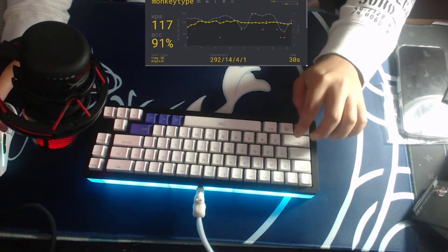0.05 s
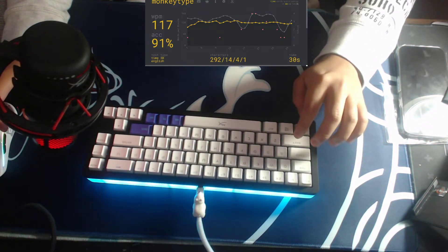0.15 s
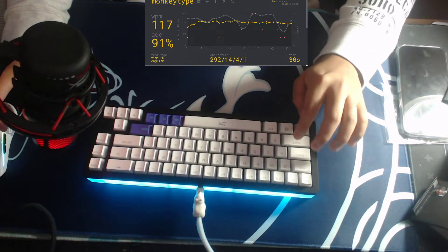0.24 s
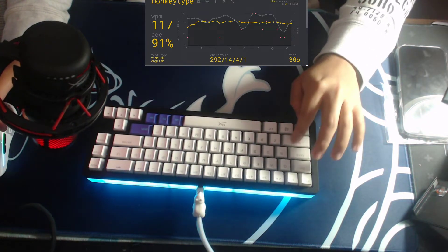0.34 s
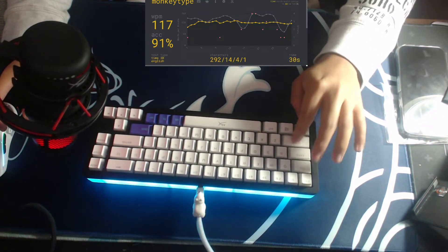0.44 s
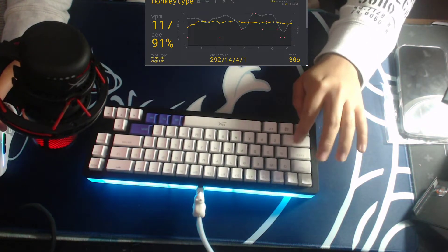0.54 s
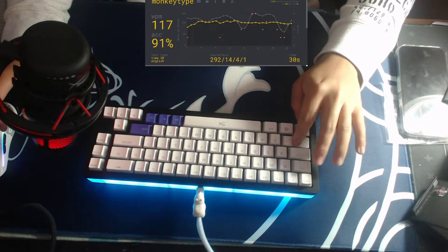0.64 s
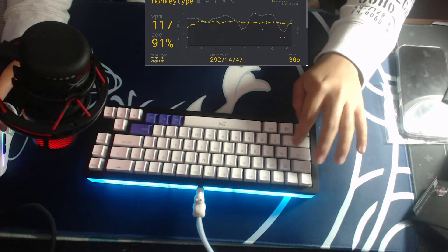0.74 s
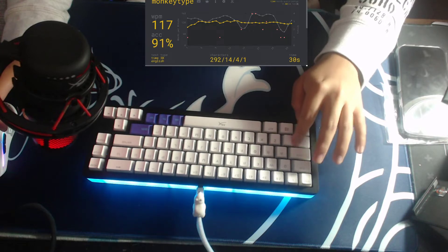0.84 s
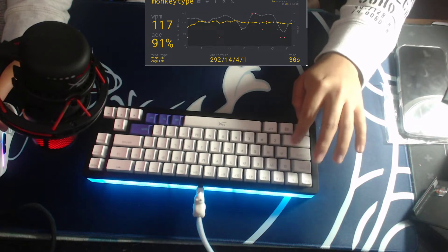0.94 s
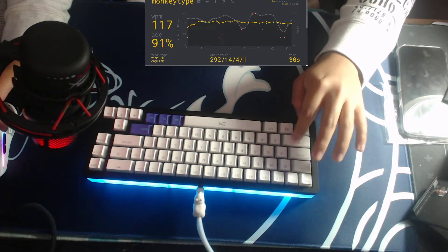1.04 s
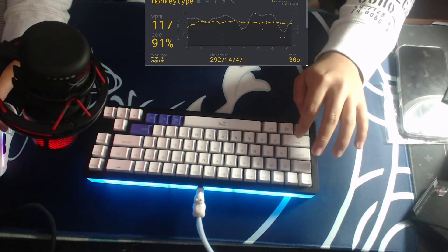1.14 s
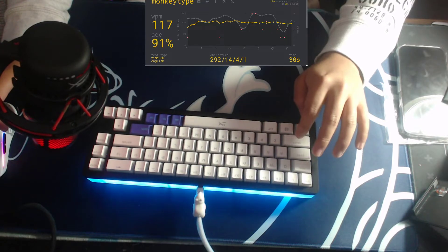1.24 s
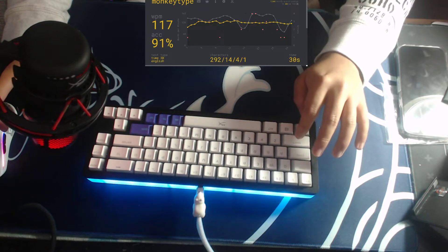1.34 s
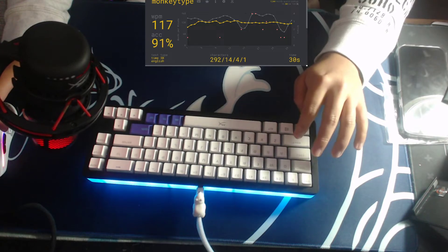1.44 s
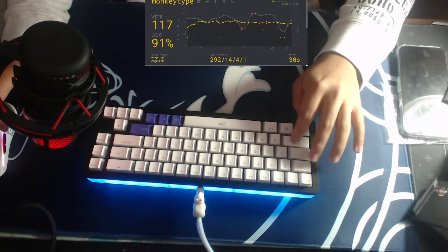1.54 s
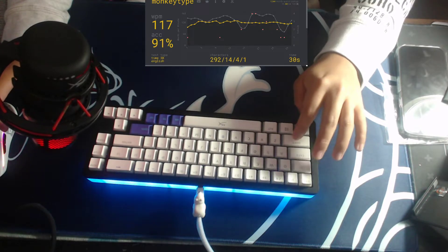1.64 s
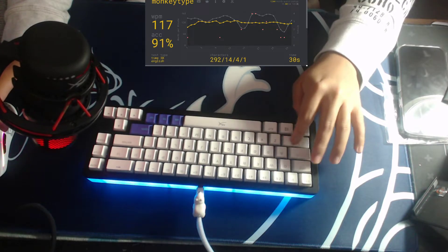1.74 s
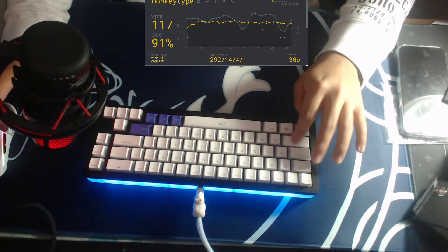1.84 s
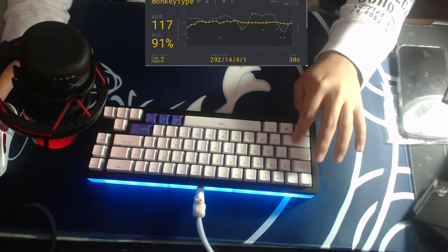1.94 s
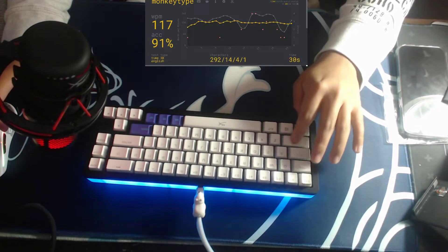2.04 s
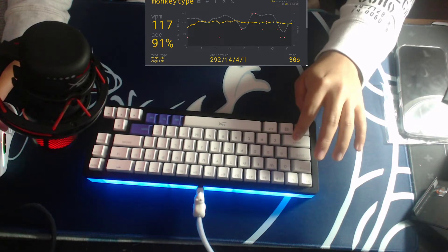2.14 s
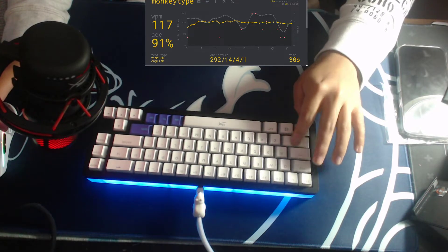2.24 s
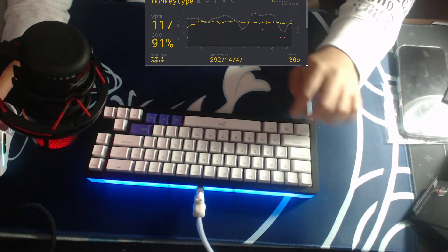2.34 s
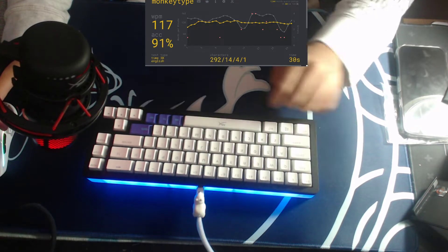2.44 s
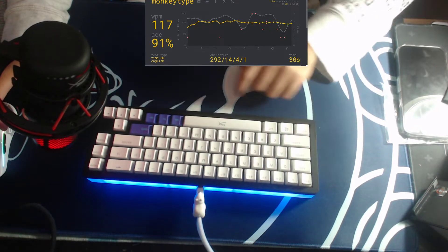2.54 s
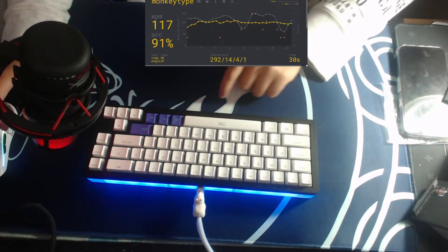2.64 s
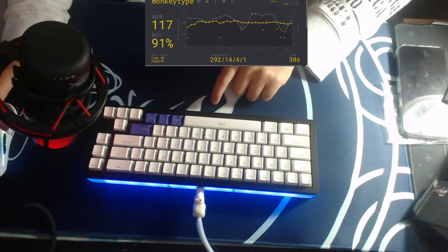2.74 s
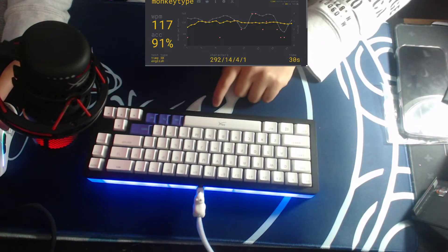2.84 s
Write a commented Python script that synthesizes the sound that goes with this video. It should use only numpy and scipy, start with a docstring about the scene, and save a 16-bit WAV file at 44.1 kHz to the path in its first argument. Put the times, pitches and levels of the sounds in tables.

```python
"""One finger taps a wide key of a mechanical keyboard in two bursts of five, near a microphone on the same desk.
Each stroke is built from ticks of the cap, noisy scrapes of the stem, and ringing knocks with a desk thump
as the key bottoms out and again, more weakly, as it springs back to its top stop.
Afterwards the hand slides over the cloth desk mat, made of shaped noise.
Behind it are a faint two-tone computer fan, a low wavering desk hum, and noise for room rumble and hiss."""
import sys
import numpy as np
from scipy import signal
from scipy.fft import rfft, irfft
from scipy.io import wavfile
from scipy.ndimage import uniform_filter1d

SR = 44100
rng = np.random.default_rng(int(sys.argv[2]) if len(sys.argv) > 2 else 0)


def log_audio(samples):
    """Write samples as a 16-bit WAV file to the path given in sys.argv[1]."""
    # one column per channel
    frames = np.atleast_2d(samples).T
    # limit to full scale, then quantise
    limited = np.clip(frames, -1, 1)
    pcm = np.round(limited * 32767).astype(np.int16)
    wavfile.write(sys.argv[1], SR, pcm)


N = 127890  # length [samples], 2.9 s


def undb(db):
    """Turn decibels into a plain multiplier."""
    return 10 ** (np.asarray(db, float) / 20)


def colour(x, table):
    """Shape a sound's spectrum with a (frequency [Hz], level [dB]) table, then set its rms to 1."""
    freqs = np.maximum(np.arange(N // 2 + 1) * SR / N, 1)
    points = np.array(table, float)
    level_db = np.interp(np.log(freqs), np.log(points[:, 0]), points[:, 1], left=-60)
    y = irfft(rfft(x) * undb(level_db), N)
    return y / np.std(y)


def walk(rate):
    """Smooth random wandering, spread near 1, from `rate` random steps per second averaged twice."""
    k = int(SR / rate)
    steps = np.repeat(rng.standard_normal(N // k + 1), k)
    return 1.06 * uniform_filter1d(uniform_filter1d(steps, k), k)[:N]


def ring(modes, push_s, extra_db=0, flip=-1):
    """Fading tones set off by a half-sine push; each start is the last one's multiplied by flip."""
    t = np.arange(SR // 4) / SR
    m = np.array(modes, float)
    gain = undb(m[:, 1] + extra_db) * flip ** np.arange(len(m))
    fade = np.exp(-np.log(1000) * t / np.maximum(m[:, 2:], 1e-3))  # 60 dB down after t60
    tones = gain @ (np.sin(2 * np.pi * m[:, :1] * t) * fade)
    push = np.sin(np.pi * np.clip(t[:SR // 40] / push_s, 0, 1))
    return np.convolve(tones, push / push.sum())[:len(t)]


def vary_modes(modes, pitch_spread):
    """No two hits excite a body alike: nudge each mode's pitch and its level (spread 1.5 dB)."""
    varied = np.array(modes, float)
    varied[:, 0] *= 1 + pitch_spread * rng.standard_normal(len(varied))
    varied[:, 1] += 1.5 * rng.standard_normal(len(varied))
    return varied


def unit_energy(x):
    """Scale a burst so its squares add up to 1."""
    return x / np.sqrt(np.sum(x ** 2))


def add(out, s, x):
    """Mix a sound in, starting at s seconds."""
    i = int(s * SR)
    out[i:i + len(x)] += x[:len(out) - i]


# spectrum of the room's rumble and hiss: (frequency [Hz], relative level [dB])
ROOM_SPECTRUM = [(8, -10), (16, 6), (28, -7.5), (58, -5.5), (100, -9.5), (138, -6.5), (170, -14.5),
                 (265, -16), (340, -22.5), (700, -28.5), (1500, -39.5), (15800, -46.5)]
ROOM_DB = -53  # rms level


def room():
    """Steady noise, strongest in the deep bass, with a faint hiss on top."""
    return undb(ROOM_DB) * colour(rng.standard_normal(N), ROOM_SPECTRUM)


def side_hiss(mid):
    """Faint noise, opposite in the two channels, that follows the treble-weighted loudness."""
    spectrum = [(12, 16), (200, 12.0), (700, 1), (4000, 12), (16000, 5)]  # (frequency [Hz], relative level [dB])
    loud = np.sqrt(uniform_filter1d(np.diff(mid, prepend=0) ** 2, size=1024) + 1e-12)
    return undb(-31.5) * loud * colour(rng.standard_normal(N), spectrum)


# low desk hum over time, before its wavering: (time [s], level [dB])
HUM_LEVEL = [(0, -62), (1.0, -54), (2.2, -50.5), (2.35, -54), (2.65, -56.5), (2.8, -58), (2.9, -76)]
HUM_HZ = 48.3  # centre of the wavering pitch


def desk_hum(t):
    """A low tone, wavering in pitch and level, comes up through the desk; it is strongest near 2.2 s."""
    tone = np.sin(2 * np.pi * np.cumsum(HUM_HZ * (1 + 0.068 * walk(18))) / SR)
    level_db = np.interp(t, *np.array(HUM_LEVEL).T) + 3.6 * walk(16)
    return np.sqrt(2) * tone * undb(level_db)


# course of the fan whine: (time [s], base pitch [Hz], level change [dB])
FAN_COURSE = [(0, 441, -2.5), (1.002, 435.4, -2), (1.453, 435, 2), (1.899, 432.5, -2), (2.5, 423.2, -10.5),
              (2.9, 427, -14)]
# the fan's tones: (multiple of the base pitch, rms level before the changes [dB])
FAN_TONES = [(0.999, -63.5), (1.198, -74)]


def fan(t):
    """Two wavering tones share a pitch that mostly sinks."""
    times, pitch_hz, level_db = np.array(FAN_COURSE).T
    hz = np.interp(t, times, pitch_hz) * (1 + 0.00051 * walk(5.35))
    phase = 2 * np.pi * np.cumsum(hz) / SR
    out = np.zeros(N)
    for multiple, db in FAN_TONES:
        out += np.sqrt(2) * undb(db + 2.7 * walk(3.0)) * np.sin(multiple * phase)
    return undb(np.interp(t, times, level_db)) * out


# the hand's slide: (time [s], level [dB], treble level relative to the rest [dB])
HAND_SLIDE = [(2.26, -88.5, -49), (2.286, -84, -27), (2.314, -64, -13), (2.348, -60.5, -22),
              (2.614, -57, -11.5), (2.674, -59, -11.5), (2.714, -65, -10), (2.73, -79, 5), (2.82, -93, 6),
              (2.836, -72.5, 7), (2.88, -76, 0), (2.9, -68, -5)]
# spectrum of the rubbed cloth: (frequency [Hz], relative level [dB])
CLOTH = [(500, -13), (1500, -11), (2400, -11), (4800, -12.5), (7800, -16.5), (10500, -25), (15700, -36)]
# spectrum of the cloth's extra treble: (frequency [Hz], relative level [dB])
CLOTH_TREBLE = [(6000, -21), (9000, -3), (12000, 0.5), (15800, -2)]


def slide(t):
    """Skin brushes cloth: noise whose strength and treble follow the slide."""
    times, level_db, treble_db = np.array(HAND_SLIDE).T
    strength = undb(np.interp(t, times, level_db, left=-120) + 1.0 * walk(39.85))
    body = colour(rng.standard_normal(N), CLOTH)
    treble = undb(np.interp(t, times, treble_db)) * colour(rng.standard_normal(N), CLOTH_TREBLE)
    return strength * (body + treble)


# stem rubbing in its housing: (start [s], end of travel [s], level [dB])
STEM_SCRAPES = [(0.21, 0.228, -51), (0.279, 0.31, -60), (0.366, 0.4, -55), (0.443, 0.467, -57),
                (0.529, 0.571, -57.5), (0.61, 0.644, -60), (0.703, 0.736, -56), (0.772, 0.813, -61.5),
                (0.881, 0.927, -53), (0.944, 0.995, -61), (1.451, 1.476, -55), (1.518, 1.558, -64),
                (1.616, 1.648, -55.5), (1.691, 1.723, -59), (1.782, 1.806, -53), (1.849, 1.891, -60),
                (1.938, 1.973, -55), (2.004, 2.038, -60), (2.115, 2.138, -52.5), (2.181, 2.213, -59)]
# spectrum of the scraping: (frequency [Hz], relative level [dB])
SCRAPE_SPECTRUM = [(530, 11.5), (900, -6.5), (1350, -2), (3010, -6.5), (4630, -7), (7130, -11), (9610, -20),
                   (11900, -15), (15700, -23.5)]
SCRAPE_RISE_S, SCRAPE_T60_S = 0.0092, 0.069  # swell, and fall by 60 dB


def scrapes(t):
    """Gritty, lumpy friction that swells as the stem starts to move and dies away after the travel."""
    grains = rng.standard_normal(N) * undb(2.3 * rng.exponential(size=N))
    grit = colour(grains, SCRAPE_SPECTRUM) * undb(2.5 * walk(250))
    strength = np.zeros(N)
    for start, end, db in STEM_SCRAPES:
        rise = np.clip((t - start) / SCRAPE_RISE_S, 0, 1)
        strength += rise * undb(db - 60 * np.clip(t - end, 0, 1) / SCRAPE_T60_S)
    return grit * strength


# small sharp clicks inside the switch: (time [s], level [dB], pitch [Hz])
SWITCH_CLICKS = [(0.2156, -44, 4900), (0.294, -48, 4740), (0.3754, -43, 4930), (0.387, -47, 11400),
                 (0.5395, -43.5, 4900), (0.551, -45, 7200), (0.7315, -41, 3870), (0.9200, -39.5, 6900),
                 (1.4590, -45.5, 4830), (1.5385, -48.5, 4400), (1.6220, -46, 4900), (1.6320, -49, 4200),
                 (1.7850, -43, 4740), (1.863, -51.5, 5200), (1.9450, -48, 4960), (1.9545, -46, 7200),
                 (1.964, -41, 3630), (1.9665, -47, 7300), (2.024, -51, 3480), (2.1244, -46, 4830)]
CLICK_T60_S, CLICK_EDGE_DB = 0.0078, -2  # ring's fall by 60 dB; edge relative to the click level


def clicks():
    """Each click is a sharp up-down edge and one short ringing tone."""
    out = np.zeros(N)
    for s, db, hz in SWITCH_CLICKS:
        add(out, s, undb(db) * ring([(hz, 0, CLICK_T60_S)], 5e-5))
        add(out, s, undb(db + CLICK_EDGE_DB) * np.array([1., -1.]))
    return out


# ticks of the cap and stabiliser wire: (time [s], level before the trim [dB], tilt [dB per octave])
CAP_TICKS = [(0.2135, -46, 9), (0.2816, -40.5, 3.5), (0.3776, -36.5, 2), (0.5417, -42, 3),
             (0.621, -54, 5.5), (0.7110, -31, 1.5), (0.784, -44, 2.5), (0.894, -26, 3.5), (0.9091, -34, 3),
             (0.9205, -37.5, 1.5), (0.9575, -44, 7), (1.4530, -59, 7), (1.4682, -47.5, 5.5),
             (1.4907, -49, 5), (1.5255, -40, 0.5), (1.6197, -56, 8.5), (1.6469, -47, -9), (1.6975, -46, 2),
             (1.7785, -54, 3), (1.8035, -41, 5.5), (1.856, -47.5, 0), (2.0078, -40, 3),
             (2.1275, -45.5, 7.5), (2.1580, -41, -2), (2.188, -37.5, 1)]
# tones of the keycap before variation: (frequency [Hz], level [dB], t60 [s])
CAP_MODES = [(1128, 7, 0.027), (1590, -2, 0.025), (2034, 0, 0.031), (2550, -6.5, 0.015),
             (3410, -4.5, 0.019), (3870, -4.5, 0.019), (4890, -6.5, 0.017), (5900, -13, 0.0092),
             (6960, -14, 0.017), (8240, -6.5, 0.0064), (9390, -28.5, 0.0026), (11000, -21, 0.0091)]
TICK_TRIM_DB, CRACK_DB = -8, -23  # trim on every tick; crack relative to the tick before its tilt
TICK_RATTLE_S, CRACK_S = 0.0004, 0.00083  # time for each to fall to 37 %


def ticks():
    """Each tick is a brief rattle of tiny contacts ringing the cap, with a crack of noise."""
    out = np.zeros(N)
    t = np.arange(800) / SR
    for s, db, tilt_db in CAP_TICKS:
        level_db = db + TICK_TRIM_DB
        contacts = rng.standard_normal(800) ** 3 * np.exp(-t / TICK_RATTLE_S)  # cubing favours a few hard ones
        tilt = tilt_db * np.log2(np.array(CAP_MODES)[:, 0] / 2000)
        cap = ring(vary_modes(CAP_MODES, 0.03), 5e-5, tilt)[:2500]
        crack = np.diff(rng.standard_normal(800), prepend=0) * np.exp(-t / CRACK_S)
        add(out, s, undb(level_db) * np.convolve(cap, unit_energy(contacts)))
        add(out, s, undb(level_db + CRACK_DB + tilt_db) * crack)
    return out


# key hits the plate: (time [s], level [dB], relative treble [dB], relative desk thump [dB], thump pitch [Hz])
BOTTOM_HITS = [(0.2264, -32, 2.5, -5.5, 74.4), (0.3893, -32, 5.5, -2.5, 64), (0.5535, -32, 0.5, -3.5, 66),
               (0.7282, -35, -0.5, -1, 63), (0.9056, -31.5, 8, -4, 65), (1.4722, -36.5, 3, -0.5, 69.5),
               (1.6358, -33.5, 2, -1.5, 64.3), (1.7990, -33.5, -5, -2.5, 63.3),
               (1.9593, -34.5, 1, -1, 72.6), (2.1342, -30.5, 5.5, -6, 72.6)]
# key springs back against its stop: (time [s], level [dB], relative treble [dB], relative desk thump [dB],
# thump pitch [Hz])
TOP_HITS = [(0.3092, -37.5, -7, -13, 89), (0.4667, -34.5, -6, -9, 73.4), (0.6380, -36.5, -6, -10, 66.5),
            (0.8110, -40.5, -10, -6.5, 56.7), (0.9945, -40, -9, -7, 50.4), (1.554, -41.5, -7, -10, 78),
            (1.7236, -40, -5, -12.5, 82), (1.8913, -41, -7, -16, 49), (2.0380, -39, -11, -18, 58.3),
            (2.2127, -39, -2, -13, 88)]
# tones of case and plate before variation: (frequency [Hz], level [dB], t60 [s])
CASE_MODES = [(300, -8.5, 0.0457), (378.7, -1.5, 0.05), (518.8, -3, 0.086), (617, -11.5, 0.022),
              (856, -10, 0.049), (1114, -12.5, 0.016), (1297, -8.5, 0.009), (1474, -1, 0.02),
              (1635, -2.5, 0.019), (1960, -4, 0.023), (2320, -5, 0.011)]
# tones of the desk: (multiple of the thump pitch, level [dB], t60 [s])
DESK_MODES = [(1.001, 4, 0.13), (1.448, -2, 0.12), (2.1, 11, 0.015)]
# spectrum of chattering loose parts: (frequency [Hz], relative level [dB])
CHATTER_SPECTRUM = [(400, -33), (700, 21), (1500, -22), (2500, 0.5), (5000, -28), (15000, -27)]
CHATTER_DB, CHATTER_RISE_S, CHATTER_T60_S, CHATTER_LEAD_S = -7.5, 0.001, 0.024, 0.001437
PLATE_PUSH_S, PLATE_LAG_S = 0.00052, 0.001014
FAR_END_LAG_S, REBOUND_LAG_S, REBOUND_DB = 0.002, 0.00651, -4
THUMP_PUSH_S, THUMP_LAG_S = 0.0021, 0.004
FINGER_LEAD_S, FINGER_DB = 0.01257, -13.5  # early thump: before the hit, relative to the main thump


def knocks(table, way, push_s, rattle_s, far_db):
    """The wide key strikes the case end after end and rebounds; plate rattles, loose parts chatter, desk thumps."""
    out = np.zeros(N)
    t = np.arange(4000) / SR
    grains = rng.standard_normal(N) * undb(1.15 * rng.exponential(size=N))
    chatter = colour(grains, CHATTER_SPECTRUM)
    fade = undb(CHATTER_DB - 60 * t / CHATTER_T60_S) * np.clip(t / CHATTER_RISE_S, 0, 1)
    low = np.array(CASE_MODES)[:, 0] < 1000  # low tones form the case hit, the others the plate
    for s, db, treble_db, thump_db, thump_hz in table:
        modes = vary_modes(CASE_MODES, 0.015)
        hit = way * undb(db) * ring(modes[low], push_s, flip=1)
        desk = np.array(DESK_MODES) * [thump_hz, 1, 1]
        thump = -way * undb(db + thump_db) * ring(desk, THUMP_PUSH_S, flip=0.75)
        # the contacts swell, then thin out; rattle_s is the mean time of their envelope
        contacts = rng.standard_normal(600) ** 3 * t[:600] * np.exp(-2 * t[:600] / rattle_s)
        plate = np.convolve(ring(modes[~low], PLATE_PUSH_S)[:3000], unit_energy(contacts))
        loose = fade * chatter[int(s * SR):][:len(fade)]
        add(out, s, hit)
        add(out, s + FAR_END_LAG_S, undb(far_db) * hit)
        add(out, s + REBOUND_LAG_S, undb(REBOUND_DB) * hit)
        add(out, s + PLATE_LAG_S, undb(db + treble_db) * plate)
        add(out, s - CHATTER_LEAD_S, undb(db + treble_db) * loose)
        add(out, s + THUMP_LAG_S, thump)
        # a fainter thump comes first; on the way down it is the fingertip landing
        add(out, s - FINGER_LEAD_S, undb(FINGER_DB) * thump)
    return out


def scene():
    """Mix the background, the hand and the key strokes, then add faint noise, opposite in the two channels."""
    t = np.arange(N) / SR
    background = room() + desk_hum(t) + fan(t)
    bottoms = knocks(BOTTOM_HITS, way=-1, push_s=0.00077, rattle_s=0.004, far_db=0)
    tops = knocks(TOP_HITS, way=1, push_s=0.0013, rattle_s=0.00051, far_db=-4.5)
    keys = scrapes(t) + clicks() + ticks() + bottoms + tops
    mid = background + slide(t) + keys
    side = side_hiss(mid)
    return np.array([mid + side, mid - side])


def record(dry):
    """The microphone signal on both channels loses everything above 15830 Hz in a steep low-pass filter."""
    return signal.sosfilt(signal.ellip(16, .3, 90, 15830, fs=SR, output="sos"), dry)


dry = scene()
out = record(dry)
log_audio(out)
```